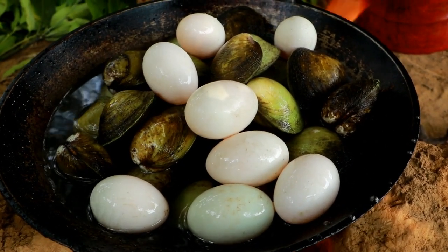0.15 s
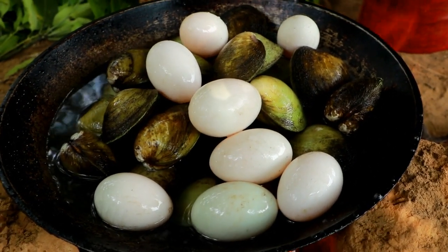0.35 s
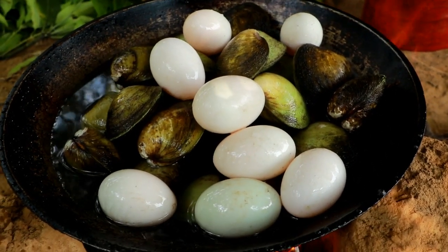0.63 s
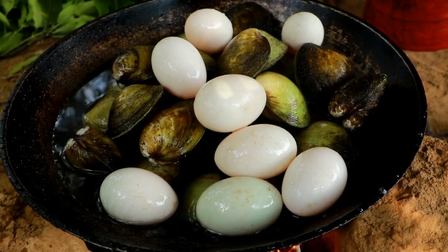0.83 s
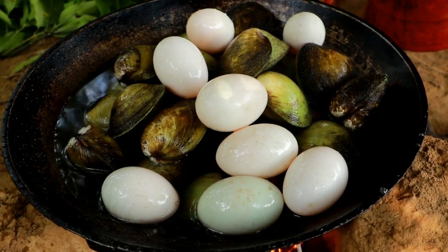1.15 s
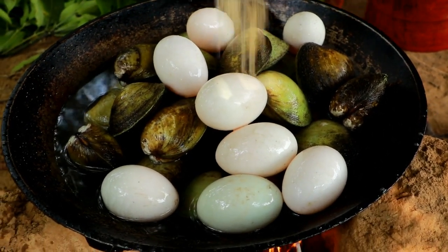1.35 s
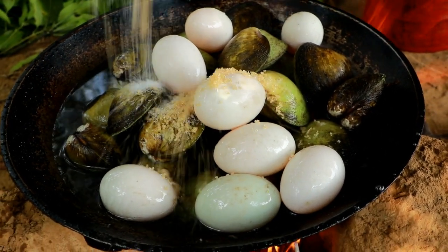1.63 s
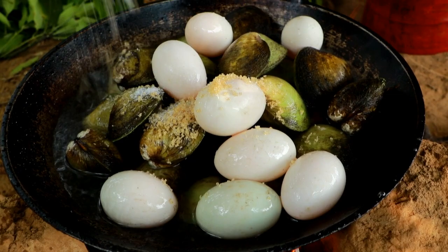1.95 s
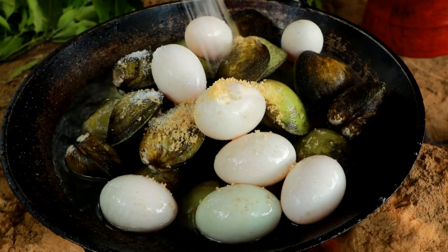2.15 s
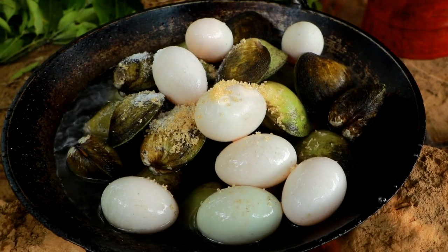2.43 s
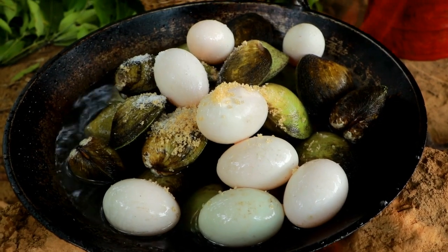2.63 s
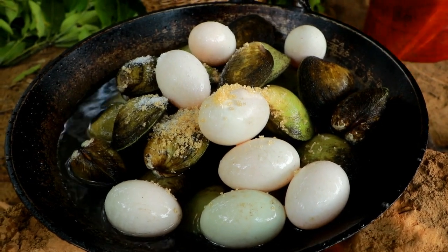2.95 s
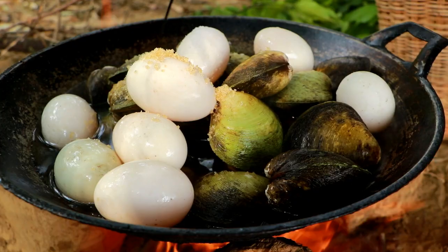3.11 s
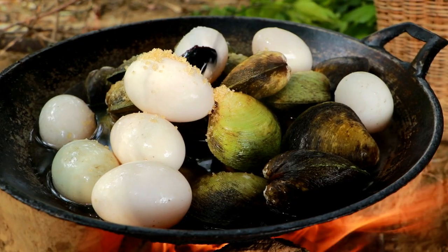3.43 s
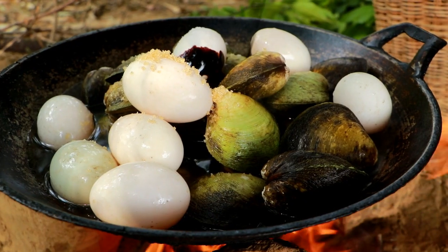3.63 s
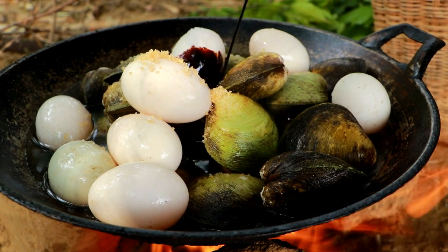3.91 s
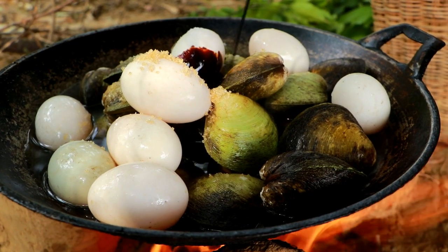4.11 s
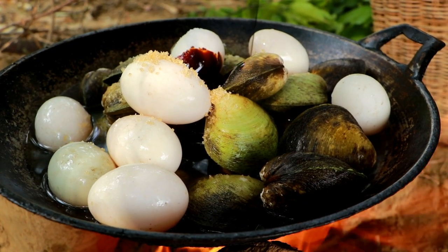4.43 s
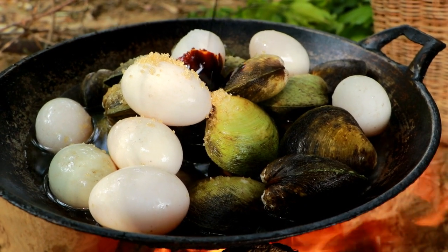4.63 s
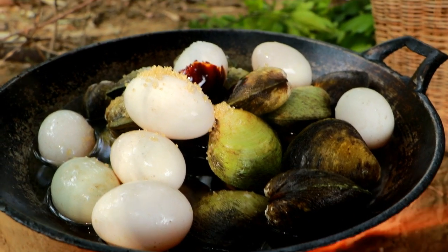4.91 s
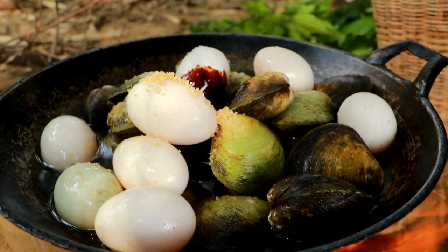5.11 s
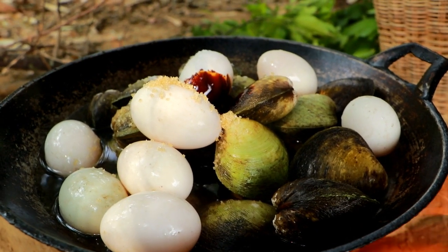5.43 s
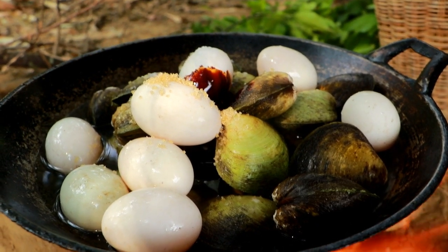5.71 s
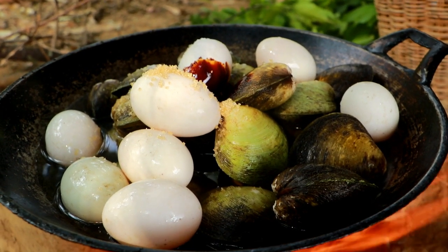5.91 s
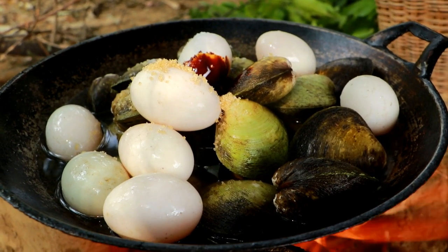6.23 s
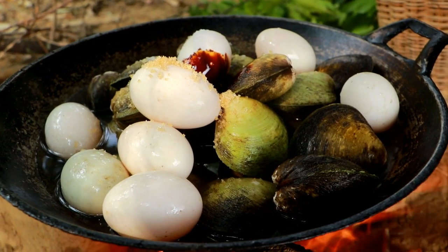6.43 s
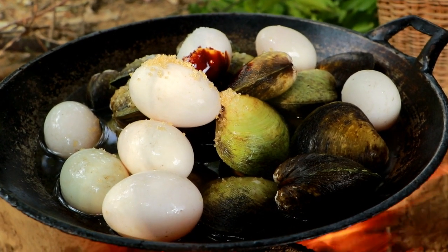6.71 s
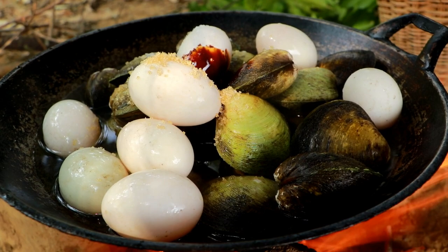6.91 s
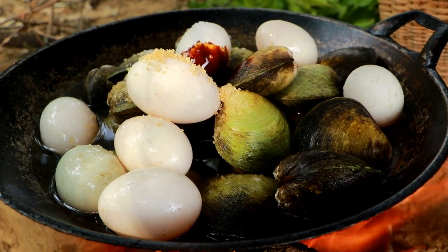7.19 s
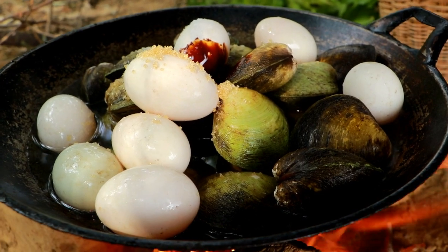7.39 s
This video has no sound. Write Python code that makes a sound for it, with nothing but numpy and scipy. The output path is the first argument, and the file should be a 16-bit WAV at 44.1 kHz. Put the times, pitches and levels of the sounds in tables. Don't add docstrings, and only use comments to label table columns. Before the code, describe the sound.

Outdoors, close to a hot wok, bright water sizzle is full of sharp popping droplets, with a low fire flutter and thin insect drone. At three seconds the view jumps back: the sizzle falls much softer, and a blade chops a wooden block near the microphone roughly three times a second, with scrapes and a flat tap. Hard blows overload and briefly duck everything. A bird whistles twice, faintly.

```python
import sys
import numpy as np
from scipy import signal
from scipy.fft import rfft, irfft, next_fast_len
from scipy.io import wavfile
from scipy.ndimage import uniform_filter1d, minimum_filter1d, map_coordinates

SR = 44100
rng = np.random.default_rng(int(sys.argv[2]) if len(sys.argv) > 2 else 0)


def persist_wave(psi):
    counts = np.round(np.clip(psi, -1, 1) * 32767).astype(np.int16)
    wavfile.write(sys.argv[1], SR, np.atleast_2d(counts).T)


def decibels_to_gain(level_db):
    exponent = np.asarray(level_db, float) / 20
    return 10 ** exponent


N = 333396
TIME = np.arange(N) / SR
MOVE_BACK_S = 2.985


def unit(x):
    return x / np.sqrt(np.mean(x ** 2) + 1e-20)


def noise(count):
    return rng.standard_normal(count)


def curves(rows):
    s, *columns = np.transpose(rows)
    return [np.interp(TIME, s, column) for column in columns]


def wobble(rate):
    return map_coordinates(noise(int(N * rate / SR) + 4), [TIME * rate])


def filtered(x, response):
    m = next_fast_len(len(x) + 4096)
    return irfft(rfft(x, m) * response(np.fft.rfftfreq(m, 1 / SR)), m)[:len(x)]


def coloured(x, points):
    f, db = np.transpose(points)
    return unit(filtered(x, lambda hz: decibels_to_gain(np.interp(np.log(hz + 1), np.log(f), db))))


def resonance(x, hz, width_hz):
    return filtered(x, lambda f: 1j * f * width_hz / (hz * hz - f * f + 1j * f * width_hz))


def low_cut(x, hz, order):
    return filtered(x, lambda f: (1j * f / (hz + 1j * f)) ** order)


def add(track, s, sound):
    part = track[max(round(s * SR), 0):][:len(sound)]
    part += sound[:len(part)]


def fizz(per_second, spread_db, share):
    bubble = rng.random(N) < per_second / SR
    size_db = spread_db * np.minimum(rng.exponential(size=N), 4)
    bursts = bubble * decibels_to_gain(size_db) * noise(N)
    return np.sqrt(share) * unit(bursts) + np.sqrt(1 - share) * noise(N)


def patchy(x, depth_db):
    z = signal.stft(x, nperseg=512)[2]
    across_pitch = uniform_filter1d(rng.standard_normal(z.shape), size=3, axis=0)
    field = uniform_filter1d(across_pitch, size=12, axis=1)
    return signal.istft(z * decibels_to_gain(depth_db * unit(field)), nperseg=512)[1][:N]


def close_view():
    return np.clip((MOVE_BACK_S - TIME) / 0.0081 + .5, 0, 1)


# [t/s, level/dB]
CLOSE_SIZZLE = [(0, -27.5), (.5, -29.5), (.83, -27.5), (1.2, -28.5), (2, -30), (2.8, -31.5), (2.97, -27.5)]
# [t/s, level/dB]
FAR_SIZZLE = [(3, -40.5), (3.6, -39), (4.2, -41), (4.8, -40), (5.5, -40.5), (5.8, -37), (6, -42),
              (6.5, -41), (6.8, -38.5), (7.1, -40.5), (7.56, -40)]
# [f/Hz, level/dB per Hz]
CLOSE_COLOUR = [(180, -54), (300, -53), (526, -15.5), (1020, -12), (1700, -4.5), (1910, -8), (2700, -4.5),
                (2990, 0), (6830, -6), (8460, -2), (10700, -13), (13700, -11), (15600, -19)]
# [f/Hz, level/dB per Hz]
FAR_COLOUR = [(180, -46), (300, -21), (477, -10), (1290, -5.5), (1730, -2), (2150, -5.5), (2660, -8.5),
              (3410, 1.5), (4370, -5), (8890, -7), (10700, -15.5), (13400, -11.5), (15600, -18)]


def sizzle():
    close = close_view()
    close_db, = curves(CLOSE_SIZZLE)
    far_db, = curves(FAR_SIZZLE)
    close_db = close_db + 1.1 * wobble(9.24) + 0.92 * wobble(40.37)
    far_db = far_db + .7 * wobble(9) + 1.26 * wobble(32)
    near = decibels_to_gain(close_db) * coloured(patchy(fizz(700, 1.65, 0.23), 1.17), CLOSE_COLOUR)
    far = decibels_to_gain(far_db) * coloured(patchy(fizz(250, 1.4, 0.068), 1), FAR_COLOUR)
    return close * near + (1 - close) * far


# [f/Hz, level/dB per Hz]
FIRE_COLOUR = [(15, 3), (30, 4), (130, 6.5), (330, 2.5), (600, -4.5), (1200, -20)]


def flame():
    flame_db = np.where(TIME < MOVE_BACK_S, -48, -49)
    flicker_db = .6 * wobble(6) + 3.3 * wobble(38)
    flutter = unit(decibels_to_gain(flicker_db) * coloured(noise(N), FIRE_COLOUR))
    return (decibels_to_gain(flame_db) + decibels_to_gain(-7.5) * scrape_pressure()) * flutter


# [f/Hz, close level/dB, far level/dB]
INSECTS = [
    (1727, -47.5, -57),
    (3390, -45.5, -54.5),
]


def insects():
    out, close = np.zeros(N), close_view()
    for hz, close_db, far_db in INSECTS:
        wander = 1.6 * hz / 1739 * wobble(9)
        swell_db = 2.2 * wobble(6)
        level_db = far_db + close * (close_db - far_db) + swell_db
        out += decibels_to_gain(level_db) * np.sin(2 * np.pi * hz * TIME + wander)
    return out


# [t/s, peak level/dB, centre f/Hz, low push against the peak/dB]
BIG_DROPLETS = [(.0268, -3, 6900, -29.5), (.0958, -2.5, 7700, -24), (.3167, -3, 7460, -24),
                (.3822, -4.5, 5230, -46), (.4174, -9, 9970, -41), (.4635, -4.5, 9270, -44),
                (.79, -8.5, 7000, -14), (.808, -3.5, 4500, -11), (1.197, -8.5, 6600, -24.5),
                (1.2244, -1.5, 6700, -30), (1.3557, -0.5, 7570, -27.5), (1.3725, -3, 8050, -47),
                (1.392, -0.5, 5840, -49), (1.4409, -7, 7300, -40), (2.5629, -6.5, 8000, -28),
                (1.562, 1, 5440, -36), (1.7016, -8, 9000, -27), (1.8155, -1, 6600, -40),
                (2.0003, -8, 6360, -13), (2.019, -1, 5700, -36), (2.0592, -9.5, 8200, -32),
                (2.1274, -12.5, 6900, -13), (2.2221, -1.5, 8350, -43), (2.301, -1.8, 7600, -21.5),
                (2.4001, -6.5, 7530, -31), (2.4326, 0.5, 7400, -49), (2.4893, -0.5, 6900, -23.5),
                (2.5426, -1.5, 8400, -43), (2.693, -5.5, 7400, -48), (2.7113, -7, 8350, -49)]
SPRAY_COUNT, STRAY_COUNT = 3, 50


def droplets():
    big = np.repeat(BIG_DROPLETS, SPRAY_COUNT, axis=0)
    late, size, pitch, push = rng.standard_normal((len(big) + STRAY_COUNT, 4)).T
    s = np.append(big[:, 0], np.zeros(STRAY_COUNT)) + .012 * late
    s[len(big):] = MOVE_BACK_S * rng.random(STRAY_COUNT)
    db = np.append(big[:, 1] - 13.5, np.full(STRAY_COUNT, -21.5)) + 3 * np.clip(size, -2, 1)
    hz = 7400 * np.exp(0.21 * pitch)
    push_db = -37 + 7 * np.abs(push)
    small = np.transpose([np.abs(s) + 0.0011, db, hz, push_db])
    return np.concatenate([BIG_DROPLETS, small])


def pops():
    out, t = np.zeros(N), np.arange(-20, 400) / SR
    after = np.maximum(t, 0)
    rim = 0.074 * decibels_to_gain(-60 * after / 0.012) * np.sin(2 * np.pi * 8500 * after)
    for s, db, hz, low_db in droplets():
        u = 2 * np.pi * 0.92 * hz * t + 1
        cycle = np.exp(.5) * u * np.exp(-u * u / 2)
        splash = 0.29 * (t > 0) * decibels_to_gain(-60 * after / 0.003) * unit(resonance(noise(len(t)), hz, hz))
        push = -decibels_to_gain(low_db + 14.0 - 60 * after / 0.0026) * (t > 0) * np.cos(2 * np.pi * 1200 * after)
        add(out, s + t[0], decibels_to_gain(db) * (cycle + rim + splash + push))
    return out


# [t/s, level/dB, f/Hz, t60/s]
BUBBLES = [(0.081, -29, 1240, 0.12), (.13, -34, 1300, .1), (.17, -33, 1166, 0.11), (.2, -29, 1296, .08),
           (3.613, -25.5, 735, 0.012), (3.631, -17.5, 2080, 0.018), (3.678, -30, 2050, .03),
           (3.705, -21, 1700, 0.021), (3.72, -22, 2000, 0.011), (3.871, -32, 2300, 0.057),
           (3.898, -30, 2400, .03), (4.102, -22, 191, 0.024), (4.124, -13.5, 840, 0.011)]


def drips():
    out, t = np.zeros(N), np.arange(5000) / SR
    for s, db, hz, t60 in BUBBLES:
        tone = np.sin(2 * np.pi * hz * t * (1 + 0.047 * t / t60))
        add(out, s, decibels_to_gain(db - 60 * t / t60) * (1 - np.exp(-t / 0.00044)) * tone)
    return out


# [t/s, level/dB, centre f/Hz, t60/s]
STEAM_JETS = [(.801, -7.5, 3500, .11), (.807, -10.5, 850, .07), (0.784, -15, 1800, 0.079),
              (1.366, -7, 9000, 0.016), (2.303, -7, 6000, 0.013), (3.42, -4.5, 8850, .013),
              (3.422, -19, 1670, 0.074), (3.431, -17, 4960, 0.01), (4.085, -17, 4300, .18),
              (4.101, -31, 4700, .097), (4.114, -27, 5940, 0.041), (4.125, -19.5, 6000, 0.013),
              (4.955, -29, 800, 0.046), (5.01, -31, 1200, 0.022), (5.059, -17, 860, 0.049),
              (5.546, -24, 7900, .02), (5.699, -13.5, 7850, .026), (5.725, -22, 6100, 0.02),
              (5.913, -8.5, 3240, 0.016), (6.172, -19, 7900, .02), (6.197, -21, 5440, 0.017),
              (6.434, -12.5, 400, .17), (6.456, -16, 5700, 0.025), (6.626, -17, 7000, 0.0075),
              (6.743, -21, 4930, 0.015), (7.002, -10.5, 5600, 0.0045), (7.047, -15.5, 4840, 0.024),
              (7.067, -13.5, 2730, 0.025), (7.097, -11, 6900, 0.0066), (7.102, -5, 6000, 0.013)]


def spits():
    out = np.zeros(N)
    for s, db, hz, t60 in STEAM_JETS:
        rise = 0.0011 + .04 * t60
        t = np.arange(-3 * rise, t60, 1 / SR)
        gusts = decibels_to_gain(3 * noise(len(t) // 30 + 1)).repeat(30)[:len(t)]
        grit = noise(len(t)) * gusts
        shape = np.where(t < 0, np.exp(-(t / rise) ** 2), decibels_to_gain(-60 * t / t60))
        puff = unit(resonance(resonance(grit, hz, 2 * hz), hz, 1.56 * hz))
        add(out, s - 3 * rise, decibels_to_gain(db - 10.5) * shape * puff)
    return out


BLOW_T = np.arange(-.012, .3, 1 / SR)
AFTER = np.maximum(BLOW_T, 0)


def mode(hz, db, t60, lag):
    return decibels_to_gain(db - 60 * AFTER / t60) * np.cos(2 * np.pi * hz * AFTER - lag)


def blow_noise(hz, width_hz):
    return unit(resonance(noise(len(BLOW_T)), hz, width_hz))


# [f/Hz, t60/s]
BLOCK_MODES = [
    (692, 0.035),
    (376, 0.012),
    (160, 0.028),
]


def block_ring(belly_db, thud_db, lag):
    levels = (0, belly_db, thud_db)
    wood = sum(mode(hz, db, t60, lag) for (hz, t60), db in zip(BLOCK_MODES, levels))
    return wood * decibels_to_gain(-10.5 / (1 + np.exp((0.0073 - BLOW_T) / 0.00078)))


# [f/Hz, level/dB, t60/s]
BLADE_MODES = [(962, 7, .02), (1508, -3, 0.056), (1357, 6.5, 0.018), (2280, -6.5, 0.03),
               (2050, -9.5, 0.022), (2520, -19, 0.037), (4700, -46, .02)]


def blade_ring(edge_db, lag):
    spread = rng.standard_normal((len(BLADE_MODES), 2)) * [.008, 1.5]
    damping = decibels_to_gain(0.38 * min(edge_db, 0))
    return sum(mode(hz * (1 + off), db + off_db, t60 * damping, lag)
               for (hz, db, t60), (off, off_db) in zip(BLADE_MODES, spread))


# [f/Hz, width/Hz, level/dB, t60/s]
YARD_RETURNS = [
    (840, 160, -41, .3),
    (2350, 90, -40, .35),
]


def yard_echo():
    tail = sum(decibels_to_gain(db - 60 * AFTER / t60) * blow_noise(hz, width) for hz, width, db, t60 in YARD_RETURNS)
    return tail * (1 - np.exp(-AFTER / 0.082))


# [t/s, blow level/dB, then against it: belly of the block/dB, food under the blade/dB, edge/dB]
CHOP_BLOWS = [(0.807, -17.5, 0, -20, -9), (3.214, -9, 16.5, 3, -16), (3.5123, 2.5, 10, 0.5, -.5),
              (3.829, -13, -16, -6, 0), (3.8341, -1.5, 10.5, -1, -15), (4.3824, 1, 8.5, -3, -23),
              (4.6827, 12, -0.5, -19.5, -4.5), (5.0222, 6, -0.5, -9, -12), (5.336, 12.5, -1, -28, -4),
              (5.587, -15.5, 3, -6, -13), (5.6498, -4.5, 5.5, -7, -33), (5.699, -24.5, 8, 10, 0),
              (5.716, -19.5, 1, 7.5, -15), (5.9474, 16, 1, -18, -11), (6.2546, 7, -1, -7, -6),
              (6.411, -9.5, -8, -4.5, -9.5), (6.4284, -8.5, 8.5, -14, 0.5), (6.458, -23, 12, -19, 3),
              (6.5819, 14, -17, -21, -0.5), (6.8915, 14.5, -40, -26, -1.5), (7.1906, 12, -2.5, -40, 1),
              (7.496, 7, 2, -17, -14.5)]


def chops():
    out, t = np.zeros(N), BLOW_T
    for s, db, belly_db, food_db, edge_db in CHOP_BLOWS:
        lag = np.pi / 2 * np.clip((db - 7.5) / 7, -1, .7)
        squeeze = np.exp(np.minimum(t, 0) / (.00016 * decibels_to_gain(-.8 * edge_db)))
        ring = 0.5 * block_ring(belly_db, food_db, lag) + decibels_to_gain(edge_db - 12.5) * blade_ring(edge_db, lag)
        bass_hz = 123 + 19 * max(db, 0)
        body = low_cut(squeeze * ring, bass_hz, 2)
        bite = np.where(t < 0, np.exp(t / 0.0036), decibels_to_gain(-60 * t / 0.013))
        crunch = decibels_to_gain(food_db - 16) * bite * blow_noise(1650, 3200)
        crack = decibels_to_gain(edge_db - 14.5) * (t > 0) * decibels_to_gain(-60 * AFTER / 0.0035) * blow_noise(2300, 2900)
        u = 2 * np.pi * 2600 * (t + .00035)
        tick = -decibels_to_gain(2 * edge_db - 7.0) * u * np.exp(-u * u / 2)
        push_level = np.clip(db, 0, 1) * decibels_to_gain(-30 + min(belly_db, 0) / 1.3)
        push = push_level * np.exp(-(t / 0.0013 + .5) ** 2)
        blow = body + push + tick + crunch + crack
        add(out, s + t[0], decibels_to_gain(db) * (blow + decibels_to_gain(edge_db / 2) * yard_echo()))
    return out


# [t/s of the top, level/dB, pitch ratio, swell/dB per s]
BIRD_CALLS = [
    (3.835, -38, 1.0, 0),
    (6.0, -45, 1.04, -70),
]
# [t/s from its top, f/Hz, level/dB]
CALL_SHAPE = [(-.12, 3900, -14), (-.1, 4100, -3.5), (-.045, 4500, -7.5), (-.02, 5070, 2), (0, 5800, -2),
              (.02, 5870, -26), (.13, 5900, -31)]


def bird():
    out = np.zeros(N)
    for top_s, call_db, ratio, swell in BIRD_CALLS:
        call = np.add(CALL_SHAPE, [top_s, 0, call_db]) * [1, ratio, 1]
        hz, db = curves(call)
        on = (TIME > call[0][0]) & (TIME < call[-1][0])
        db = db + 4.0 + swell * np.clip(TIME - top_s, -.1, 0) + wobble(55)
        out += on * decibels_to_gain(db) * np.sin(2 * np.pi * np.cumsum(hz) / SR)
    t = np.arange(SR // 2) / SR
    trees = decibels_to_gain(-60 * t / 0.85) * noise(len(t))
    return out + decibels_to_gain(2.0) * signal.fftconvolve(out, trees / np.linalg.norm(trees))[:N]


# [t/s, hold/s, level/dB]
DRAGS = [
    (4.794, 0.1, -51),
    (5.641, 0.0031, -25.5),
    (5.698, .2, -42.5),
    (6.414, .04, -44),
]


def scrape_pressure():
    out = np.zeros(N)
    for s, hold, db in DRAGS:
        bite_db = 1500 * np.maximum(s - TIME, 0)
        release_db = 337 * np.maximum(TIME - s - hold, 0)
        out += decibels_to_gain(db - bite_db - release_db)
    return out


def scrapes():
    hollow = resonance(resonance(noise(N), 764, 210), 860, 230)
    return scrape_pressure() * decibels_to_gain(0.63 * wobble(20)) * unit(hollow)


# (t/s, level/dB, modes [f/Hz, level/dB, t60/s])
FLAT_TAP = (4.8303, -5.5, [(410, -9, .04), (1150, 0, .03), (820, -15, .08), (1900, 3.5, .015),
            (2700, -11, .025), (600, -7, .016)])


def flat_tap():
    out, struck = np.zeros(N), BLOW_T > 0
    s, db, modes = FLAT_TAP
    ring = struck * sum(mode(hz, level, t60, -np.pi / 2) for hz, level, t60 in modes)
    crack = struck * decibels_to_gain(-15.5 - 60 * AFTER / 0.017) * blow_noise(4000, 4500)
    add(out, s + BLOW_T[0], decibels_to_gain(db) * low_cut(ring + crack, 330, 3))
    return out


def scene():
    wok = sizzle() + pops() + drips() + spits()
    block = chops() + scrapes() + flat_tap()
    return (wok + insects() + block + bird())[None]


def roll_off(x):
    return signal.sosfilt(signal.butter(12, 16920, fs=SR, output="sos"), x)


def record(dry):
    loud = np.sqrt(np.abs(uniform_filter1d(dry[0] ** 2, size=40)) + 1e-12)
    over_db = np.maximum(20 * np.log10(loud) + 5.23, 0) * 1.145
    held = -minimum_filter1d(-over_db, size=601, origin=300)
    climb_db = 105 * TIME
    back = np.maximum.accumulate(held + climb_db) - climb_db
    duck_db = signal.lfilter([.005], [1, .005 - 1], back)
    x = dry * decibels_to_gain(-duck_db) + flame() * decibels_to_gain(-.3 * duck_db)
    x = x / (1 + np.abs(x) ** 12) ** (1 / 12)
    x = filtered(x[0], lambda hz: .03 + .97 / (1 + (hz / 15900) ** 200))[None]
    return roll_off(x)


dry = scene()
out = record(dry)
persist_wave(out)
```